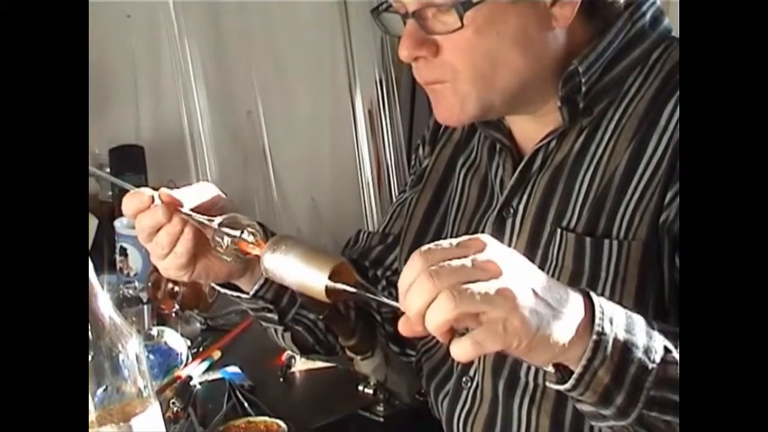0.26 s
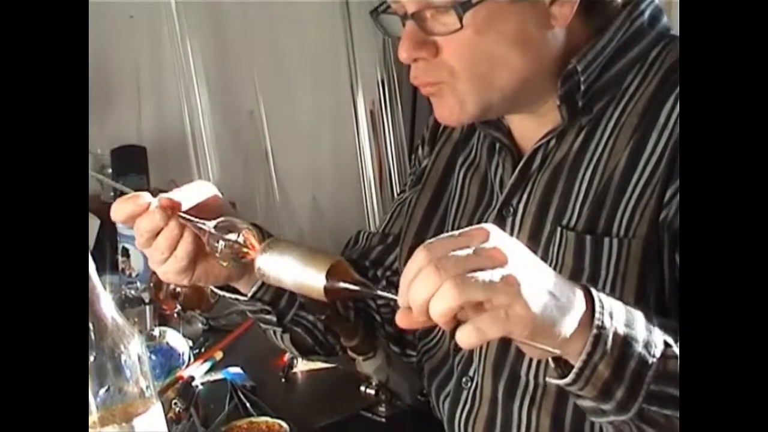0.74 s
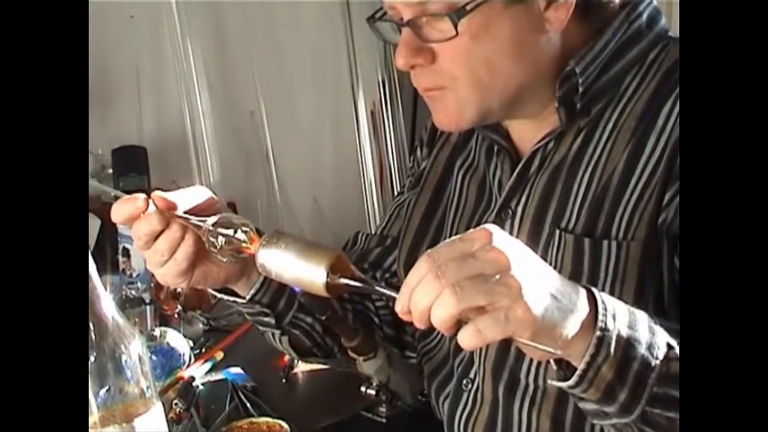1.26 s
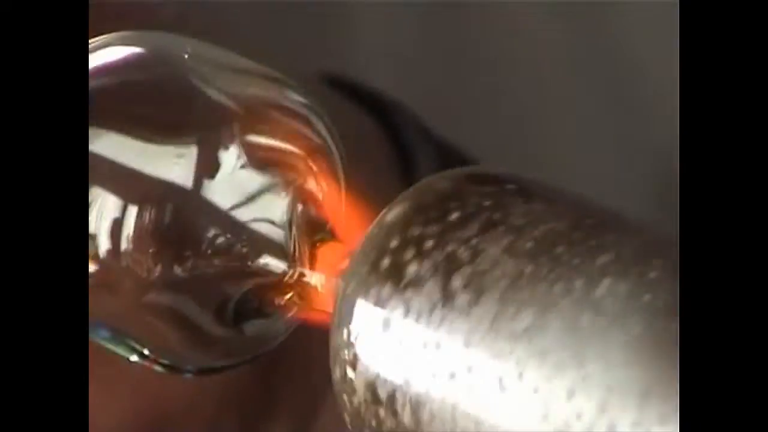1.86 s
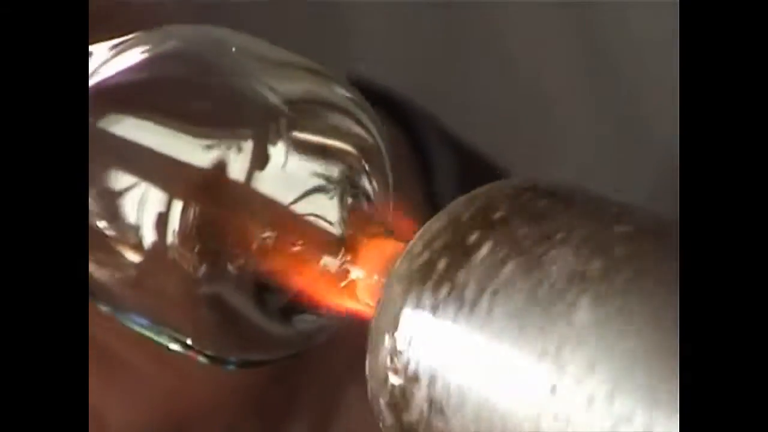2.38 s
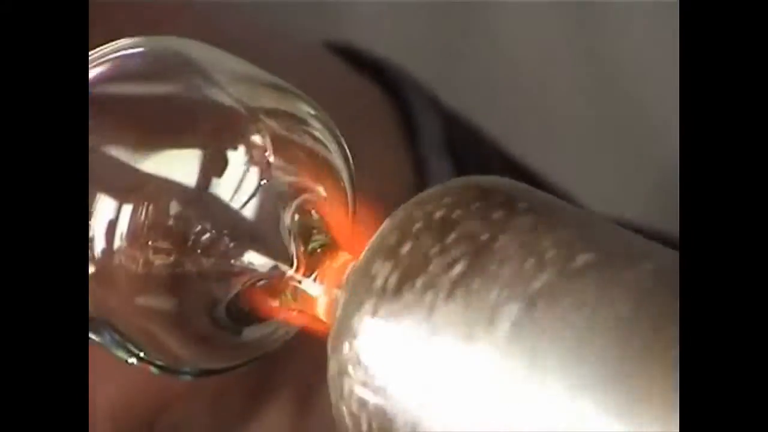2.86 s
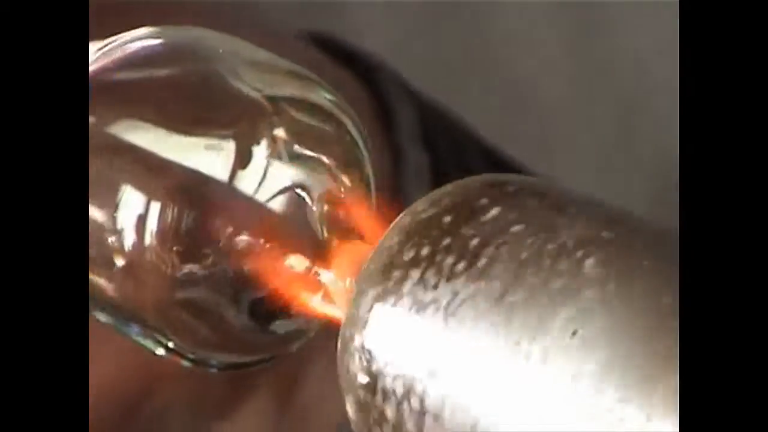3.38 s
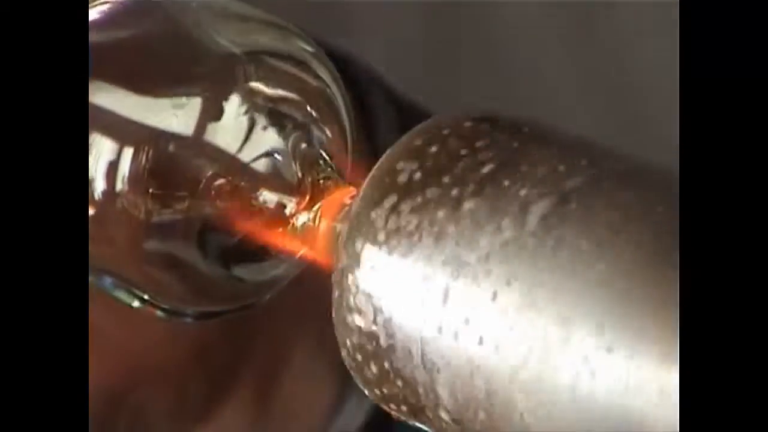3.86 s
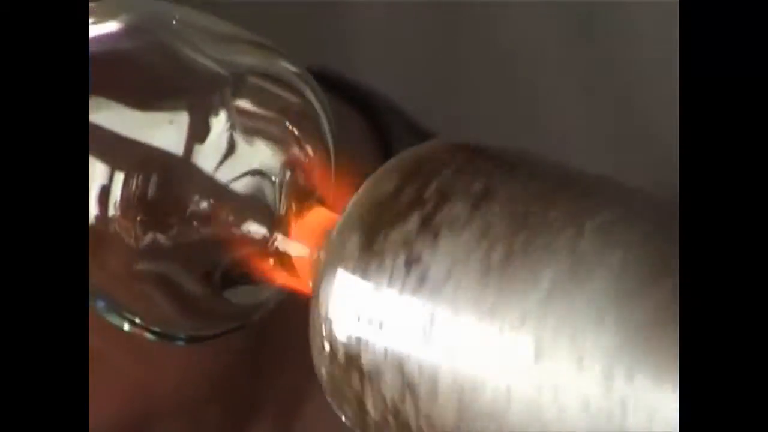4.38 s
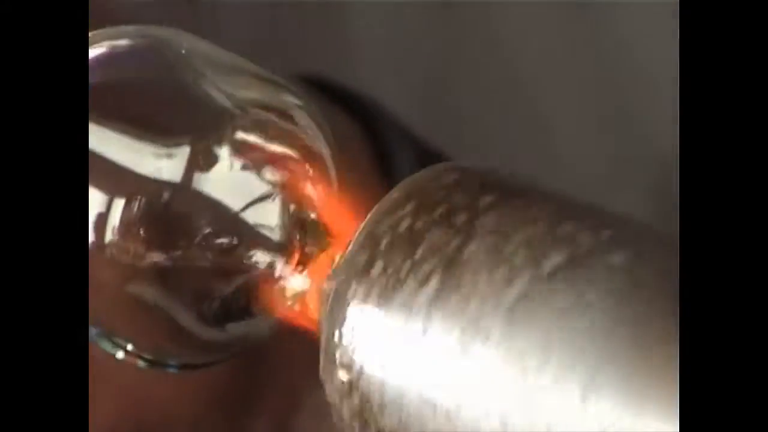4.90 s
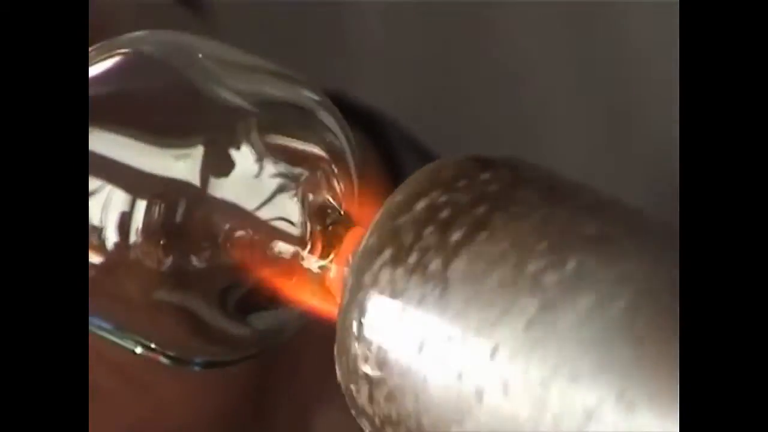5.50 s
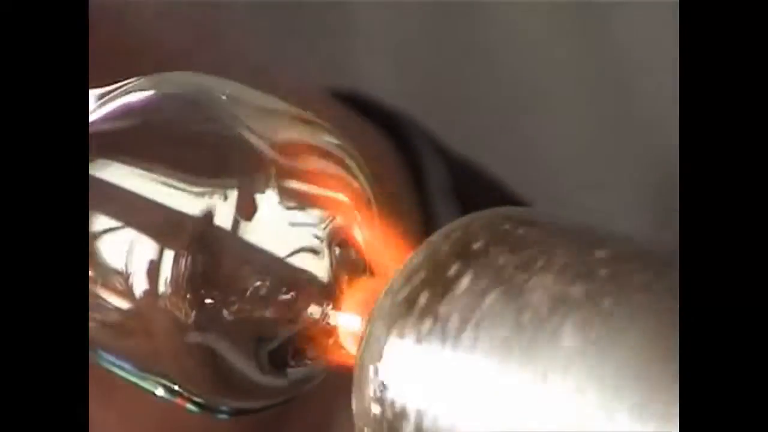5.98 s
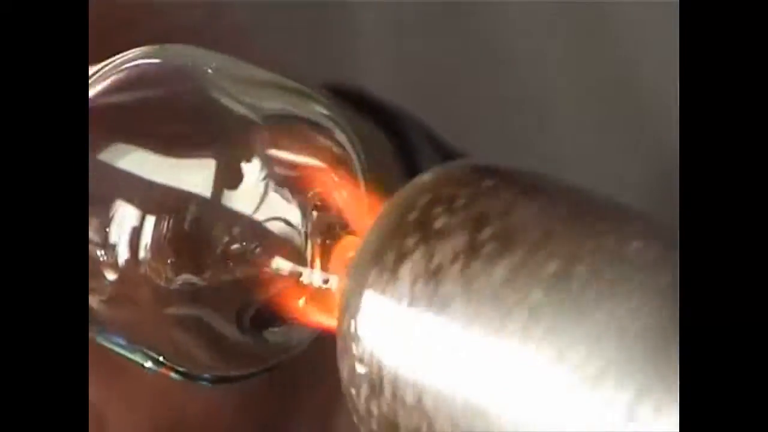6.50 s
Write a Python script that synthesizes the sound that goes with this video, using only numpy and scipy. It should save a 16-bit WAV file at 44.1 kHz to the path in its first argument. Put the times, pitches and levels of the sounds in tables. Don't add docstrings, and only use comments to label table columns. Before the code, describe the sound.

In a small workshop, a torch flame plays on a glass bulb about a metre from a stereo camera microphone. A subdued hiss begins under soft, low, fluttering thuds; these stop short at half a second. The hiss then rises to a full, steady, bright rush with fine flicker, and very faint short glassy tones slip through it later.

```python
import sys
import numpy as np
from scipy import signal
from scipy.fft import rfft, irfft, next_fast_len
from scipy.io import wavfile
from scipy.ndimage import uniform_filter1d

SR = 44100
rng = np.random.default_rng(int(sys.argv[2]) if len(sys.argv) > 2 else 0)


def boost(x):
    u = np.asarray(x, float) / 20
    return 10 ** u


def master_out(mix):
    frames = np.transpose(np.atleast_2d(mix))
    ceiling = np.clip(frames, -1, 1)
    pcm = np.round(ceiling * 32767).astype(np.int16)
    wavfile.write(sys.argv[1], SR, pcm)


N = 297407
SIZE = next_fast_len(N + SR)
HZ = np.maximum(np.arange(SIZE // 2 + 1) * SR / SIZE, 1)
TIME = np.arange(N) / SR


def level(x, db):
    return x * boost(db) / np.sqrt(np.mean(x ** 2))


def over_hz(table):
    hz, value = np.transpose(table)
    return np.interp(np.log(HZ), np.log(hz), value)


def shape(x, gain):
    return irfft(rfft(x, SIZE) * gain, SIZE)[..., :N]


def band(lo_hz, hi_hz, order=4):
    low_edge = 1 + (lo_hz / HZ) ** 4
    high_edge = 1 + (HZ / hi_hz) ** (2 * order)
    return 1 / np.sqrt(low_edge * high_edge)


def walk(rate_hz):
    hold = int(SR / rate_hz)
    steps = np.repeat(rng.standard_normal(N // 200)[:N // hold + 1], hold)
    w = uniform_filter1d(uniform_filter1d(steps, hold), hold)[:N]
    w = w - uniform_filter1d(w, 6 * hold)
    return w / w.std()


# (time [s], lift [dB], centre [Hz], length [s])
SURGES = [(2.75, 1, 6300, 0.13), (3.95, -1, 6000, 0.088), (6.4, 1, 7400, 0.13), (6.4, -3.5, 400, .2),
          (1.5, 0.5, 4400, .15), (0.61, -3, 240, .25), (.62, 0, 500, .15), (3.2, 6, 40, .14),
          (3.2, 4, 82, .14), (3.85, 11, 120, .05), (5.14, 3, 7000, .04), (2.66, 1, 8500, .08),
          (1.506, -0.5, 4800, .15), (2.07, 1, 12500, 0.17), (3.195, 6.5, 2300, 0.02),
          (3.155, -5, 3500, .015), (3.9, 0.5, 2900, 0.086), (5.18, 2, 2800, .025), (5.226, -3, 5000, .025),
          (3.9, 1, 7000, 0.089), (5.5, 1.1, 3700, 0.15), (5.85, 0, 4900, .2), (6.08, 2.5, 3200, 0.11)]


def jet():
    full_db, subdued_db, creep_s = -46, -6, [0.46, 1.59]
    surge_octaves, spacing_octaves = 0.48, 0.75
    hiss_db = full_db + np.interp(TIME, creep_s, [subdued_db, 0])
    eddies = rfft(rng.standard_normal((3, SIZE)))
    flutter, shimmer = walk(32), walk(55)
    octave = np.log2(HZ)
    out = 0
    for centre in np.arange(4, 14.6, spacing_octaves):
        share = np.cos(np.pi / 2 * np.clip((octave - centre) / spacing_octaves, -1, 1)) ** 2
        follow = np.clip((centre - 9) / 4.4, .65, 1.4)
        db = follow * (0.25 * flutter + 0.49 * shimmer + 0.61 * walk(36) + 0.91 * walk(70))
        for s, lift_db, hz, span_s in SURGES:
            away = centre - np.log2(hz)
            if abs(away) < 1:
                db = db + lift_db * np.exp(-(away / surge_octaves) ** 2 - ((TIME - s) / span_s) ** 2)
        out = out + boost(db) * irfft(eddies * share, SIZE)[:, :N]
    return out * boost(hiss_db)


# (frequency [Hz], density [dB per Hz])
JET_COLOUR = [(240, -37), (400, -23.5), (614, -17.5), (990, -12), (1430, -8.5), (1750, -10), (1900, -5),
              (2400, -5.5), (4940, -3.5), (7030, -4), (9000, -6), (12500, -7), (13400, -11), (14700, -10.5),
              (15600, -11.5)]
# (frequency [Hz], width [Hz], peak [dB])
RESONANCES = [(531.5, 55, -18), (753, 78, -13), (938, 6.8, -6), (1066, 38, -6), (1107, 35, -7), (1360, 81, -8),
              (1467, 40, -6), (1587, 12, -4.5), (1765, 14, -4.5),
              (1895, 40, -0.5), (1969, 50, 2.5), (2033, 30, 2.5), (2146, 60, 0), (2305, 40, -4), (2634, 36, 0),
        (2805, 60, -1.5), (3005, 60, -4), (3186, 28, 3), (3265, 20, -3), (3306, 24, 0), (3490, 40, 0),
        (3550, 60, -3), (4030, 70, 0.5), (4266, 25, -3), (4385, 50, -1), (4711, 28, -1.5),
              (5290, 150, -3), (5465, 30, -4), (5890, 40, -4), (5947, 25, -2), (6000, 40, -2), (6030, 240, -1),
          (6385, 70, -3.5), (6527, 30, -3), (6804, 36, 2), (6962, 45, -1.5), (7026, 22, 1), (7270, 170, 0),
          (7385, 28, -1), (7554, 28, -1.5), (7720, 26, -2.5), (7843, 45, 1), (8180, 40, -4),
          (8345, 65, -2.5), (8600, 35, -8),
              (9370, 65, -4), (10100, 55, -5), (10420, 90, -4.5), (11600, 70, -7), (12200, 200, -7),
           (13300, 150, -8)]


def rings():
    power = 0
    for f, width_hz, db in RESONANCES:
        power = power + boost(db) ** 2 / (1 + (2 * (HZ - f) / width_hz) ** 2) ** 2
    return boost(-over_hz(JET_COLOUR)) * np.sqrt(power)


def shop():
    t60_s, gap_s = 0.22, 0.0067
    t = np.arange(SR // 2) / SR
    echo = rng.standard_normal((2, len(t))) * boost(-60 * t / t60_s) * (t > gap_s)
    return rfft(echo / np.sqrt(np.sum(echo ** 2, axis=1, keepdims=True)), SIZE)


# (frequency [Hz], width [Hz], depth [0-1])
HOLLOWS = [(70, 12, 0.26), (206, 12, 0.46), (246.4, 13.5, 0.7), (261, 11, 0.54), (330, 18, 0.2),
           (386, 9.4, 0.37), (426, 21, 0.5), (815, 10, 0.2), (1170, 35, 0.24), (1763, 20, 0.26),
           (2270, 30, 0.2), (3800, 66, 0.1), (5100, 150, 0.3), (12600, 90, .4), (14480, 110, .5),
           (14850, 90, .55), (15200, 70, .4)]


def hollows():
    gain = 1
    for f, width_hz, depth in HOLLOWS:
        gain = gain * (1 - np.clip(depth, 0, .9) / (1 + (2 * (HZ - f) / width_hz) ** 2))
    return gain


def ports(lean_db, lead_rad):
    side = np.array([[1], [-1]]) / 2
    return boost(side * lean_db) * np.exp(1j * side * lead_rad)


# (frequency [Hz], density [dB per Hz])
ROAR_COLOUR = [(12, -40), (20, -21), (40, -10.5), (60, -7), (72, -13), (88, -12.5), (98, -5), (130, -16),
               (150, -17), (162, -5.5), (172, -1), (222, 2), (282, 1.5), (318, -6), (368, -1), (426, -5),
               (480, -7.5), (620, -34)]
# (frequency [Hz], squared share [0-1])
DIRECT = [(30, .2), (130, 0.55), (300, 0.23), (640, 0.33), (1410, 0.54), (3100, 0.39), (6820, 0.29),
          (9000, .22), (15000, 0.21)]
# (frequency [Hz], left minus right [dB])
LEAN = [(60, 4.5), (130, 17), (380, 6), (1290, 3), (2380, .5), (4400, 1.5), (8120, 3), (15000, -1)]
# (frequency [Hz], lead of the left port [rad])
LEAD = [(60, -0.91), (1000, 0.75), (1650, -1.5), (2000, 0.52), (6000, 0.29), (8300, 1), (11000, 1.4),
        (14000, 1.5)]
# (frequency [Hz], share [0-1])
SAME_PATH = [(200, .08), (700, .2), (2500, .3), (5000, .55), (9000, .55), (11000, .55), (14000, .65)]


def torch():
    plain_db, ring_db, roar_db, shift_s = -0.5, 1, -13, 5
    lean_db, lead_rad = over_hz(LEAN), over_hz(LEAD)
    direct = np.sqrt(np.clip(over_hz(DIRECT), .01, .98))
    plain_power = boost(plain_db) ** 2
    ring_power = (boost(ring_db) * rings()) ** 2
    power = plain_power + ring_power
    straight = (direct * plain_power + np.sqrt(direct) * ring_power) / power
    colour = np.hypot(boost(over_hz(JET_COLOUR)), boost(over_hz(ROAR_COLOUR) + roar_db)) * hollows()
    summed = straight * np.cos(lead_rad / 2) ** 2 + (1 - straight) / 2
    colour = colour * np.sqrt(power / summed)
    mid_band = (HZ > 1500) & (HZ < 5000)
    colour = colour / np.sqrt(np.mean((colour * mid_band) ** 2)) * boost(0.73)
    near = np.sqrt(straight) * ports(lean_db, lead_rad)
    far = np.sqrt(1 - straight) * ports(lean_db, 0)
    fixed = np.clip(over_hz(SAME_PATH), 0, 1)
    core, *outskirts = jet()
    turn = np.pi * TIME / shift_s
    walls = 0
    for part in (np.cos(turn), np.sin(turn)):
        walls = walls + shape(core * part, colour * far * np.sqrt(fixed) * shop())
    scattered = shape(np.array(outskirts), colour * far * np.sqrt(1 - fixed))
    return shape(core, colour * near) + walls + scattered


# (time [s], lift [dB], centre [Hz], width [Hz], length [s])
SHADES = [(5.3, 3, 943, 40, .8), (.01, 2.3, 2196, 90, .8), (5.9, 1.2, 2000, 70, .7),
          (1.5, -1.2, 2000, 200, .3), (6.68, -2.1, 2670, 300, .3), (3.31, .9, 2756, 300, .8),
          (4.0, 2, 2632, 50, .4), (4.7, -1.6, 2800, 300, .4), (.01, 3.1, 2971, 90, .5),
          (.01, -3.1, 3229, 90, .5), (5.2, 2, 3190, 60, .3), (.55, 1.4, 3746, 300, .8),
          (5.82, .9, 3789, 600, .5), (3.05, -1.1, 3832, 600, .8), (.01, -4, 4694, 90, .5),
          (4.82, -2.5, 5254, 160, .3), (4.4, 1, 5857, 300, .8), (6.3, -2.3, 5960, 150, .8),
          (.27, -1.8, 6675, 160, .8), (3.61, 1.1, 6933, 600, .8), (1.17, -3, 7105, 300, .5),
          (.01, -2.7, 7278, 90, .8), (6.58, 2.1, 7321, 160, .5), (1.1, 2, 7708, 90, .8),
          (4.19, -1.9, 7881, 300, .3), (.2, -3.2, 8268, 90, .5), (4.86, 2, 8311, 160, .5),
          (3.87, -2.7, 8570, 160, .5), (6.03, 2.9, 8570, 90, .5), (2.52, 3.2, 9087, 90, .3),
          (4.86, 1.5, 9388, 300, .5), (.06, -2.1, 9474, 300, .8), (3.38, 2.1, 9948, 300, .5),
          (4.49, -1.5, 10034, 300, .5), (1.29, -1.4, 10379, 600, .3), (6.3, 2.4, 10508, 160, .3),
          (2.15, 2.1, 10723, 600, .3), (.08, 1.9, 10981, 300, .5), (4.42, -1.9, 11326, 300, .8),
          (1.2, 2.2, 11412, 160, .8)]


def turning(x):
    depth = 1.2
    hz, s, frames = signal.stft(x, SR, nperseg=1024)
    db = 0
    for at_s, lift_db, f, width_hz, span_s in SHADES:
        over_band = np.exp(-((hz - f) / width_hz) ** 2)
        over_time = np.exp(-((s - at_s) / span_s) ** 2)
        db = db + lift_db * np.outer(over_band, over_time)
    return signal.istft(frames * boost(depth * db), SR, nperseg=1024)[1][:, :N]


# (time [s], thud level [dB])
GUSTS = [
    (.05, -58.5),
    (.121, -58),
    (.17, -65),
    (.215, -55.5),
    (.25, -58),
    (.285, -51.5),
    (.32, -59),
    (.36, -54.5),
    (.41, -71),
    (.455, -71),
]


def gusts():
    rise_s, fade_db_s, calm_db = 0.0051, 64, -70
    power = boost(calm_db) ** 2
    for s, db in GUSTS:
        age_s = np.maximum(TIME - s, 0)
        power = power + (boost(db - fade_db_s * age_s) * (1 - np.exp(-age_s / rise_s))) ** 2
    return 10 * np.log10(power)


# (frequency [Hz], density [dB per Hz])
BUFFET_COLOUR = [(9, -30), (60, -10), (100, -8.5), (140, -15), (190, -1.5), (260, -3.5), (360, -9.5),
                 (450, -8), (600, -20), (900, -25)]
# (time [s], peak [dB], frequency [Hz])
PUFFS = [(0.051, -46, 183), (0.121, -38, 180), (0.052, -47, 320), (0.119, -35, 337), (0.164, -35, 256),
         (0.225, -42, 190), (0.415, -43, 215), (0.286, -33, 199), (0.317, -50, 196), (0.344, -43, 219),
         (0.364, -43, 191), (0.379, -41.5, 227)]


def buffet():
    end_s, stop_s, lean_share = 0.497, 0.008, 0.5
    sway_db, rush_db, rush_growth = -65, -59.5, 1.2
    sag_db, sag_s, puff_db, puff_s = -55, 0.04, -14, 0.018
    thud_db = gusts()
    on = np.clip((end_s - TIME) / stop_s, 0, 1)
    air = rng.standard_normal((3, N)) * boost(1.6 * walk(59.2))
    alike = np.clip((HZ + 120) / 250, .1, .9)
    air = shape(air[0], alike) + shape(air[1:], np.sqrt(1 - alike ** 2))
    thud = level(shape(air, boost(over_hz(BUFFET_COLOUR))), thud_db)
    sway = level(shape(air, band(11, 76, order=2)), sway_db)
    smooth_db = uniform_filter1d(thud_db, SR // 20, origin=SR // 50)
    rush = level(shape(air, band(750, 1900, order=2)), rush_db + rush_growth * (smooth_db + 56))
    sag = -boost(sag_db) * np.exp(-TIME / sag_s) * np.array([[.8], [1.2]])
    puffs, t = np.zeros(N), np.arange(SR // 10) / SR
    for s, db, hz in PUFFS:
        k = int(s * SR)
        puffs[k:k + len(t)] += boost(db + puff_db) * np.sin(2 * np.pi * hz * t) * np.exp(-t / puff_s)
    return shape(on * (thud + sway + rush + puffs + sag), ports(lean_share * over_hz(LEAN), 0))


# (time [s], peak [dB], frequency [Hz])
FLARES = [
    (1.6, -61, 3187),
    (1.7, -61, 2300),
    (3.3, -54, 2630),
    (4, -56, 2900),
    (4.85, -48, 3300),
    (5.17, -53, 4300),
    (4.2, -45, 2630),
    (4.195, -51, 3180),
]


def flares():
    span_s = 0.015
    out = np.zeros(N)
    for s, db, hz in FLARES:
        swell = boost(db) * np.exp(-((TIME - s) / span_s) ** 2)
        out += swell * np.sin(2 * np.pi * hz * TIME)
    return out


def scene():
    return turning(torch()) + flares() + buffet()


def roll_off(x):
    return signal.sosfilt(signal.butter(12, 15660, fs=SR, output="sos"), x)


def record(dry):
    return roll_off(dry)


dry = scene()
out = record(dry)
master_out(out)
```